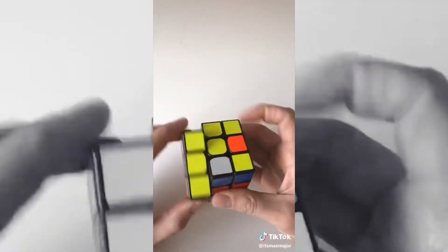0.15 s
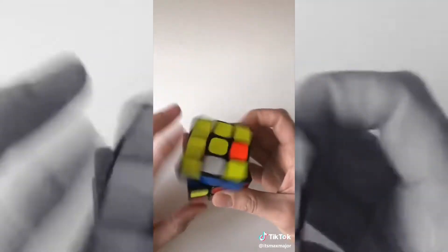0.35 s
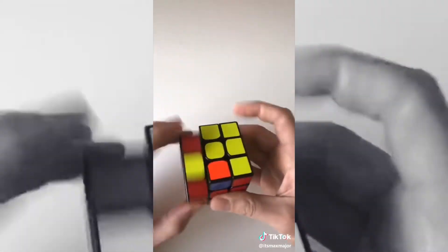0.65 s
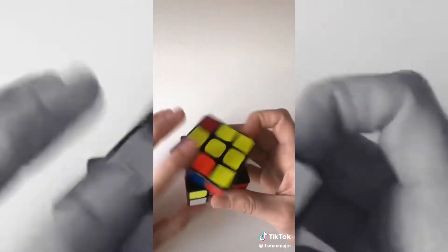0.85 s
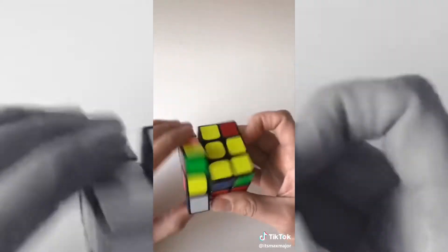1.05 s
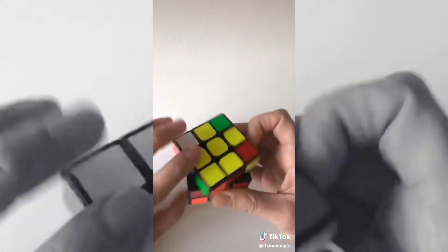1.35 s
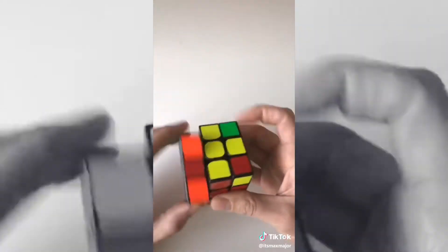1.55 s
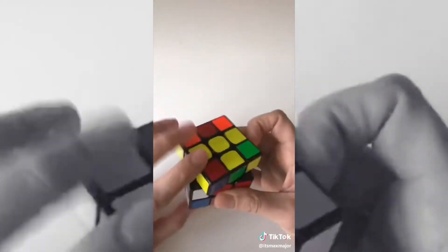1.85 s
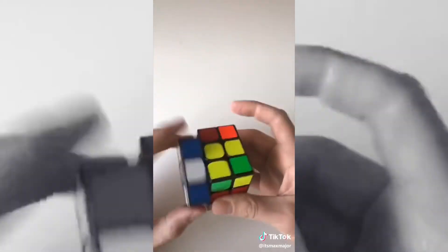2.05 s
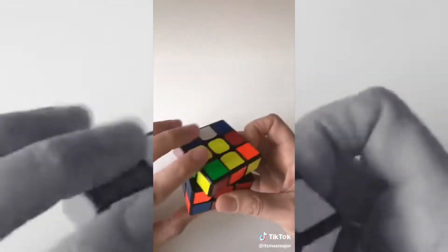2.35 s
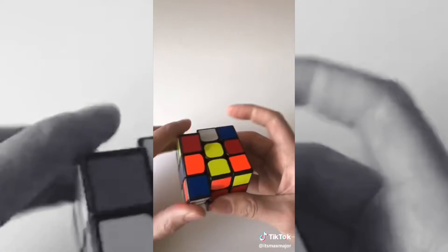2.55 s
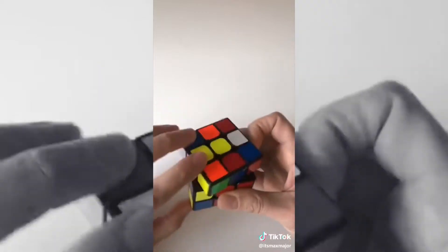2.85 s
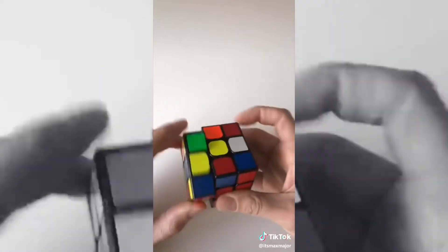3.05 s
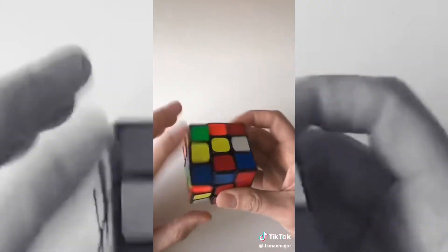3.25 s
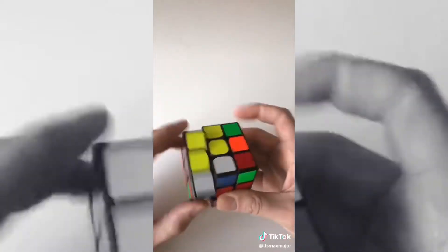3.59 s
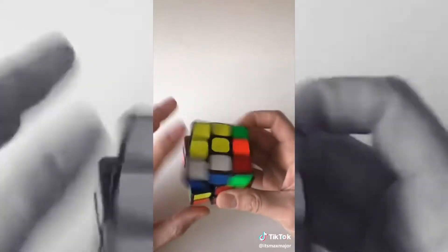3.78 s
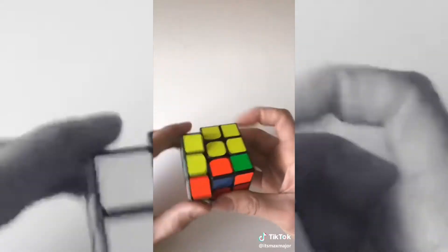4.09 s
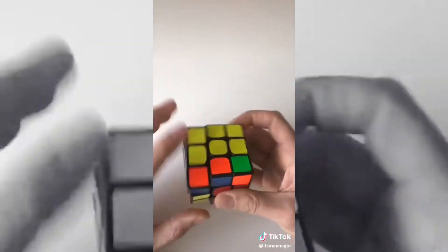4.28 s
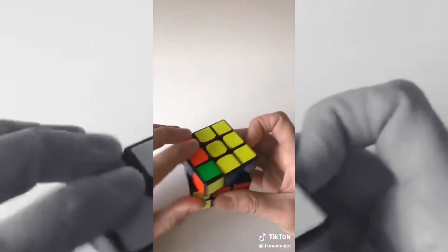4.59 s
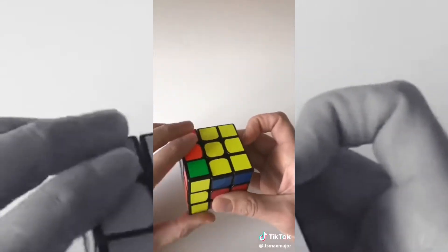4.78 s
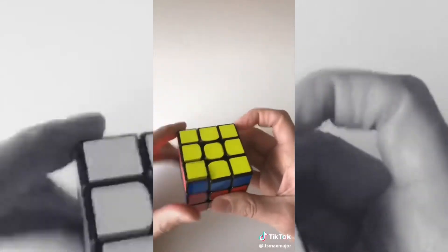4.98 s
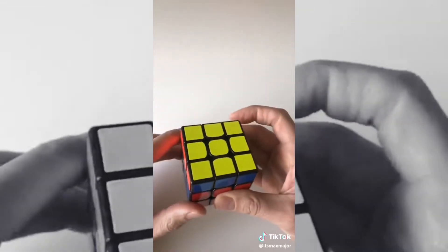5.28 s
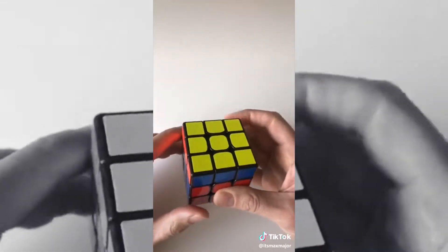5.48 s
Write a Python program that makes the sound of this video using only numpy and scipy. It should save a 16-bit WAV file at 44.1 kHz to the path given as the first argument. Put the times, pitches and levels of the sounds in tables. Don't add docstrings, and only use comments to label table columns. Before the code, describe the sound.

A hollow plastic puzzle cube is turned quickly by hand, very close to a small microphone in a quiet furnished room. Light clicks open the scene, then a sharp snap at about 0.27 s. Moderate turns follow roughly every quarter second, each a short rub and rattle with a catch, pieces riding over edges and a dry landing. A hard snap comes at 2.65 s, the loudest at 3.2 s, then others at 3.72 s and 4.24 s, with a softer one at 3.95 s; each pushes a dull thump into the palms. After faint ticks, a turn clacks at 4.8 s, two very faint high squeaks come around 5 s, and a last turn lands near 5.45 s. The room adds a short, faint tail. Beneath lie steady bassy house noise, a dull low boom around 1.3-1.9 s and a faint distant traffic rumble swelling near 4.9 s.

```python
import sys
import numpy as np
from scipy import signal
from scipy.fft import rfft, irfft
from scipy.io import wavfile

SR = 44100
rng = np.random.default_rng(int(sys.argv[2]) if len(sys.argv) > 2 else 0)


def output_pcm(signal):
    pcm = np.clip(np.atleast_2d(signal).T, -1, 1) * 32767
    wavfile.write(sys.argv[1], SR, np.round(pcm).astype(np.int16))


def volts(x):
    e = np.asarray(x, float) / 20
    return 10 ** e


N = 248283


def rms_one(x):
    return x / np.sqrt(np.mean(x ** 2, axis=-1, keepdims=True) + 1e-20)


def level(rows):
    s, db = np.transpose(rows)
    return volts(np.interp(np.arange(N) / SR, s, db, left=-200, right=-200))


def at_hz(points, hz):
    table_hz, value = np.transpose(points)
    return np.interp(np.log(hz), np.log(table_hz), value)


def ring(clicks, hz, t60):
    r = volts(-60 / (t60 * SR))
    w = 2 * np.pi * hz / SR
    return signal.lfilter([0, np.sin(w)], [1, -2 * r * np.cos(w), r * r], clicks + 1e-18)


def narrow_noise(hz, width_hz):
    t60 = np.log(1000) / (np.pi * width_hz)
    once = ring(rng.standard_normal(N), hz, t60)
    return rms_one(ring(once, hz, t60))


def grains(shape, per_s, spread_db):
    draw = rng.random((*shape, 3))
    present = draw[..., 0] < per_s / SR
    size_db = -spread_db * np.log(draw[..., 1] + 0.0036)
    return present * volts(size_db) * np.sign(draw[..., 2] - .5)


def ring_time(hz):
    return .008 * np.sqrt(1500 / hz)


def struck(contacts, modes, tilt_db):
    detune, colour_db = .055, 2.8
    hz, db = np.transpose(modes)
    shift = rng.standard_normal((len(contacts), len(modes), 2))
    w = 2 * np.pi * hz * (1 + detune * shift[..., 0])
    db = db + tilt_db[:, None] * np.log2(hz / hz[-1])
    gain = volts(db + colour_db * shift[..., 1]) * (-1) ** np.arange(len(modes))
    size = contacts.shape[1]
    jw = 2j * np.pi * np.arange(size // 2 + 1) * SR / size
    response = 0
    for k in range(len(modes)):
        wk = w[:, [k]]
        damping = np.log(1000) / ring_time(hz[k])
        response = response + gain[:, [k]] * jw ** 2 / wk / ((jw + damping) ** 2 + wk ** 2)
    return irfft(rfft(contacts) * response, size)


# frequency in Hz, level in dB.
THUD_MODES = [(420, -11), (620, 2.5), (800, 5.5), (1000, 4.5)]
# frequency in Hz, level in dB.
BODY_MODES = [(1250, -9), (1490, -1), (1780, -3.5), (2080, -1), (2480, -1), (2800, -8)]
# frequency in Hz, level in dB.
SHELL_MODES = [(3100, -10), (3550, -8), (4000, -5), (4700, -4), (5400, -3), (6100, 0), (6830, -1)]
# frequency in Hz, level in dB.
EDGE_MODES = [(7900, -7.5), (8490, 2.5), (9150, 0), (9850, -9), (11200, -7.5), (12400, -2.5)]


def knocks(s, shell_db, body_db, edge_db=-9.5):
    size = 1536
    t = np.arange(size) / SR
    hardness = np.clip((shell_db + 45) / 25, 0, 1)
    lasts = .0007 - .0001 * hardness
    phase = t / lasts[:, None]
    swell = phase ** 2 * np.exp(-phase)
    parts = [(THUD_MODES, body_db - 13, 0), (BODY_MODES, body_db, 0),
             (SHELL_MODES, 0, 12), (EDGE_MODES, edge_db, 0)]
    hits = 0
    for modes, db, tilt_db in parts:
        contacts = grains(phase.shape, per_s=7000, spread_db=4.5) * swell
        rung = struck(contacts, modes, tilt_db * hardness)
        rung = rung / np.sqrt(np.sum(rung ** 2, axis=1, keepdims=True) / 140)
        hits = hits + volts(shell_db + db + 1.3)[:, None] * rung
    out = np.zeros(N + size)
    starts = np.maximum(np.round((s - 2 * lasts) * SR), 0).astype(int)
    for start, hit in zip(starts, hits):
        out[start:start + size] += hit
    return out[:N]


# start, fastest moment and end in seconds, rub level in dB.
TURNS = [(0, 0.001, 0.12, -63.5), (0.189, 0.225, 0.24, -63.5), (0.238, 0.265, 0.3, -37),
         (0.478, 0.524, 0.6, -51.5), (0.7, 0.723, 0.79, -54), (0.799, 0.826, 0.89, -68),
         (0.894, 0.968, 1.03, -49.5), (1.13, 1.18, 1.23, -53), (1.275, 1.33, 1.37, -80),
         (1.368, 1.4, 1.51, -49), (1.599, 1.672, 1.72, -54.5), (1.768, 1.793, 1.87, -86),
         (1.862, 1.91, 2.0, -47.5), (2.061, 2.17, 2.25, -57), (2.328, 2.389, 2.47, -47.5),
         (2.528, 2.566, 2.62, -64.5), (2.606, 2.657, 2.7, -39.5), (2.76, 2.786, 2.84, -66.5),
         (2.847, 2.902, 2.96, -47), (3.109, 3.157, 3.18, -64.5), (3.166, 3.198, 3.225, -39.5),
         (3.387, 3.427, 3.52, -48.5), (3.658, 3.714, 3.79, -48.5), (3.867, 3.928, 4.02, -50.5),
         (4.197, 4.243, 4.28, -42.5), (4.36, 4.423, 4.62, -75.5), (4.699, 4.772, 4.81, -59.5),
         (4.8, 4.86, 4.9, -51), (4.912, 4.933, 4.96, -67), (5.392, 5.447, 5.53, -53.5)]
# time in seconds, rub level in dB.
GRIP = [(0, -73.5), (.4, -72.5), (.7, -68), (1.1, -72), (1.75, -75.5), (2.5, -76.5), (3.0, -78.5),
        (3.6, -76), (4.5, -76.5), (5.63, -86)]


def sliding():
    t = np.arange(N) / SR
    rub = 0
    for modes, db in [(THUD_MODES, -15), (BODY_MODES, -5), (SHELL_MODES, -4), (EDGE_MODES, -8)]:
        friction = np.diff(grains((N + 1,), per_s=2500, spread_db=3))
        rung = 0
        for k, (hz, mode_db) in enumerate(modes):
            rung = rung + volts(mode_db) / hz * ring(friction, hz, ring_time(hz)) * (-1) ** k
        rub = rub + volts(db) * rms_one(rung)
    speed = level(GRIP)
    for start, fastest, end, db in TURNS:
        speed = speed + volts(db) * np.interp(t, [start, fastest, end], [0, 1, 0]) ** 1.5
    return speed * rub


def chatter():
    count, gap_s, against_rub_db, spread_db = 28, .007, -5, 5.5
    start, fastest, end, rub_db = np.transpose(TURNS)[..., None]
    draw = rng.random((len(TURNS), count, 2))
    s = start + gap_s * (np.arange(count) + draw[..., 0])
    speed = np.minimum((s - start) / (fastest - start), (end - s) / (end - fastest))
    speed_db = 22 * np.log10(np.clip(speed, 1e-9, 1))
    db = (rub_db + against_rub_db + spread_db * (2 * draw[..., 1] - 1) + speed_db).ravel()
    body_db = 0.5 - 0.38 * (db + 52) + 2.5 * rng.standard_normal(len(db))
    return knocks(np.minimum(s.ravel(), N / SR - .01), db, body_db)


# frequency in Hz, level in dB per Hz.
HOUSE = [(22, -18), (42, -1.5), (120, -1), (350, -12), (1200, -21), (3200, -28.5), (10500, -32),
         (13500, -31)]


def house():
    hz = np.maximum(np.arange(N // 2 + 1) * SR / N, 1)
    spectrum = rfft(rng.standard_normal(N)) * volts(at_hz(HOUSE, hz))
    return volts(-64.5) * rms_one(irfft(spectrum, N))


# time in seconds, shell level in dB, hollow body and edge in dB against the shell.
CATCHES = [(0.008, -46, -4.5, -15.5), (0.193, -43, -7.5, -10), (0.243, -41, -2, -9),
           (0.4687, -57.5, 2.5, 13), (0.7151, -41, 3.5, -2.5), (0.909, -42, -0.5, 1),
           (1.1417, -53.5, 10, -2), (1.1653, -48.5, 9.5, -17), (1.3856, -38, 2, -1.5),
           (1.6085, -45, 0, -23), (1.6537, -42, 2, -1.5), (1.8395, -50, -3.5, 8.5), (1.8835, -46.5, 8, -2),
           (2.0751, -56, -32, -4), (2.1402, -50.5, 9.5, -2), (2.3542, -55.5, -13, 8.5),
           (2.6246, -40.5, 4.5, -11), (2.8645, -54.5, 11, -4.5), (2.9141, -38, 0.5, 4.5),
           (3.1772, -42.5, 0.5, -11), (3.3754, -52.5, -0.5, 4.5), (3.4035, -48, 9, 1), (3.459, -45, 6.5, 8),
           (3.689, -41.5, 0.5, -16), (3.8262, -58, -2, 10.5), (3.892, -47, 2.5, -14),
           (4.1551, -46, -4.5, -4.5), (4.2152, -52, -2, -5), (4.8118, -44.5, -2, -3),
           (5.4173, -43.5, -1, -8)]


def catches():
    return knocks(*np.transpose(CATCHES))


# time in seconds, shell level in dB, hollow body in dB against the shell.
TICKS = [(0.0218, -59, -2.5), (0.0766, -54, 5), (0.5128, -53, -1), (0.4908, -57, 8), (0.8143, -58, -6),
         (0.8347, -62, 2.5), (0.8661, -57.5, 6.5), (1.1288, -59, 0), (1.3058, -63, 7.5),
         (1.3369, -59.5, 7.5), (1.3642, -57, 0), (1.7917, -61.5, 1.5), (1.861, -63, -5), (2.0961, -55.5, 5),
         (2.2688, -46.5, -7), (1.738, -65, 2), (2.5544, -60.5, 3.5), (2.7822, -61.5, 6), (5.3973, -62, 0),
         (3.9985, -52.5, -6), (3.1337, -61, 8.5), (3.6705, -53, -1), (4.1469, -59, -3.5), (4.3744, -58, 2),
         (4.418, -59.5, 0), (4.5249, -69.5, 6), (4.7445, -61, 7), (4.7789, -58.5, 3.5), (4.942, -73, 10),
         (5.592, -70.5, 7.5)]


def ticks():
    return knocks(*np.transpose(TICKS))


# time in seconds, shell level in dB, hollow body and edge in dB against the shell.
SNAPS = [(0.2659, -17.5, -15.5, -5), (0.269, -22.5, -4, -5.5), (0.2739, -23.5, -3, -5),
         (2.6457, -36, -17, -2.5), (2.6496, -30.5, -8, -3), (2.6521, -21.5, -13.5, -7.5),
         (2.6573, -25.5, -1.5, -5.5), (3.1992, -23.5, -14, -3.5), (3.2027, -14.5, -8.5, -10),
         (3.2102, -29.5, -1.5, -9), (3.2142, -36.5, -9, -1), (3.7229, -17.5, -17, -13.5),
         (3.9524, -28, -7, -2.5), (4.2438, -16.5, -8.5, -5), (4.2477, -31.5, -7, -1),
         (4.2516, -25.5, -9, -7.5), (4.2586, -37.5, -5.5, -12)]


def snaps():
    return knocks(*np.transpose(SNAPS))


def push():
    hz, t60 = 243, 0.021
    clicks = np.zeros(N)
    for s, shell_db, *_ in SNAPS:
        clicks[int(s * SR)] = volts(shell_db - 32.5)
    return ring(clicks, hz, t60) - ring(clicks, 1.4 * hz, t60)


# time in seconds, shell level in dB, hollow body in dB against the shell.
LANDINGS = [(0.2924, -48.5, -6), (0.3512, -54.5, 3), (0.5364, -44, 1), (0.5747, -57, 1),
            (0.7695, -53.5, 9.5), (1.0054, -48.5, -1), (1.1964, -44.5, -5), (1.21, -52.5, 2.5),
            (1.4441, -44, 4), (1.6829, -45, 0), (1.686, -49, 2), (1.9423, -39, 0), (1.9792, -56, -3),
            (2.1718, -45.5, 0), (2.2287, -58.5, 0), (2.4147, -46.5, 4), (2.665, -40.5, 0),
            (2.6702, -44, -2), (2.927, -43, 3.5), (3.4644, -40, 0), (3.4963, -53.5, 3),
            (3.7745, -54.5, 7.5), (3.9622, -45.5, 2.5), (4.8345, -40.5, -10), (4.8601, -51, 2),
            (4.8759, -46, -3), (5.4391, -42, 4.5), (5.463, -41.5, 1), (5.468, -44.5, 0), (5.5188, -59, 9)]


def landings():
    return knocks(*np.transpose(LANDINGS))


# time in seconds, shell level in dB, hollow body in dB against the shell.
RIDES = [(0.5033, -43, -2.5), (0.5293, -55.5, 7), (0.7285, -46, 4.5), (0.9388, -50.5, 5.5),
         (0.9711, -45, -4.5), (0.9776, -42, -7), (1.1761, -49, 6), (1.408, -40, 0.5), (1.4332, -38.5, 1),
         (1.4377, -42.5, 0.5), (1.624, -61, 15), (1.9072, -41.5, 4), (1.9135, -40, 0.5), (1.926, -43.5, -1),
         (1.9311, -41, 6.5), (2.3713, -37.5, -4), (2.3789, -39, 4.5), (2.3934, -37.5, -7), (2.637, -41, -3),
         (2.892, -46.5, 3.5), (3.1919, -40.5, -5.5), (3.4291, -39, -0.5), (3.4543, -38.5, 3),
         (3.7046, -38.5, 7.5), (3.7133, -38.5, -27), (3.9189, -43, -9), (3.9229, -37.5, 0.5),
         (4.2358, -48.5, 3), (4.8302, -35.5, -5), (5.446, -48, 8.5)]


def rides():
    return knocks(*np.transpose(RIDES))


# time in seconds, level in dB, 60 dB decay time in seconds.
BOOM = [
    (1.27, -58.5, 0.17),
    (1.355, -59.5, 0.39),
    (1.555, -53.5, 0.54),
    (3.85, -61.5, 0.28),
]


def boom():
    hz, rise_s = 191, 0.053
    t = np.arange(N) / SR
    swell = 0
    for s, db, t60 in BOOM:
        decay = volts(db - 60 * np.maximum(t - s, 0) / t60)
        swell = swell + decay * np.clip(1 + (t - s) / rise_s, 0, 1) ** 2
    tone = np.sqrt(2) * np.sin(2 * np.pi * hz * t)
    return swell * (tone + .5 * narrow_noise(hz, width_hz=120))


# time in seconds, level in dB.
TRAFFIC = [
    (4.6, -76),
    (4.912, -64),
    (5.63, -83),
]


def traffic():
    return level(TRAFFIC) * narrow_noise(hz=54, width_hz=12)


# start in seconds, level in dB, length in seconds, pitch in Hz.
SQUEAKS = [
    (4.945, -72, 0.052, 6170),
    (5.05, -68, 0.046, 6120),
]


def squeaks():
    t = np.arange(N) / SR
    out = 0
    for s, db, lasts, hz in SQUEAKS:
        swell = np.sin(np.pi * np.clip((t - s) / lasts, 0, 1)) ** .5
        tone = narrow_noise(hz, width_hz=500) + volts(-9) * narrow_noise(1.93 * hz, width_hz=500)
        out = out + volts(db) * swell * tone
    return out


# frequency in Hz, 60 dB decay time in seconds.
ROOM_T60 = [(500, 0.67), (1500, .4), (6000, 0.27), (12000, 0.23)]


def room(x):
    size = 2 ** 15
    t = np.arange(size) / SR
    edges = 300 * 2 ** np.arange(0, 5.6, .5)
    tail = 0
    for low, high in zip(edges, edges[1:]):
        half_octave = signal.butter(2, [low, high], "band", fs=SR, output="sos")
        band = signal.sosfilt(half_octave, rng.standard_normal(size))
        tail = tail + band * volts(-60 * t / at_hz(ROOM_T60, np.sqrt(low * high)))
    tail = tail * np.clip((t - .002) / .005, 0, 1)
    return volts(-22) * signal.fftconvolve(x, tail / np.sqrt(np.sum(tail ** 2)))[:N]


def blows():
    return catches() + ticks() + snaps() + landings() + rides()


def scene():
    rustle = chatter() + sliding()
    small = signal.butter(2, 300, "high", fs=SR, output="sos")
    direct = signal.sosfilt(small, blows() + rustle) + push()
    count = 4
    walls = sum(room(blows() + rustle) for _ in range(count)) / np.sqrt(count)
    return (direct + walls + house() + boom() + traffic() + squeaks())[None]


def roll_off(x):
    return signal.sosfilt(signal.butter(12, 14270, fs=SR, output="sos"), x)


def record(dry):
    dip_hz, dip_width_hz, dip_share = 10200, 880, 0.34
    peak = signal.iirpeak(dip_hz, dip_hz / dip_width_hz, fs=SR)
    dry = dry - dip_share * signal.lfilter(*peak, dry)
    top = .7
    dry = top * np.tanh(dry / top)
    steep = signal.ellip(7, 1, 30, 13000, fs=SR, output="sos")
    mix = signal.sosfilt(steep, dry)
    return roll_off(mix)


dry = scene()
out = record(dry)
output_pcm(out)
```